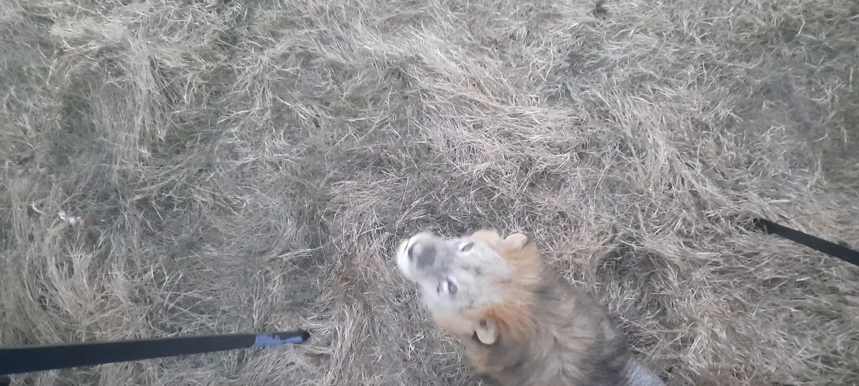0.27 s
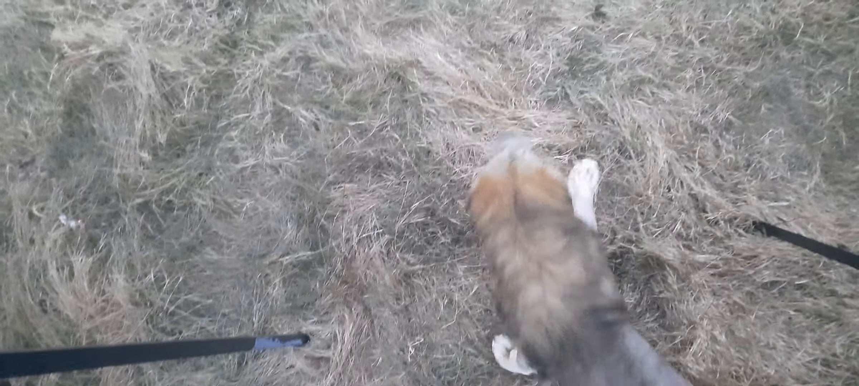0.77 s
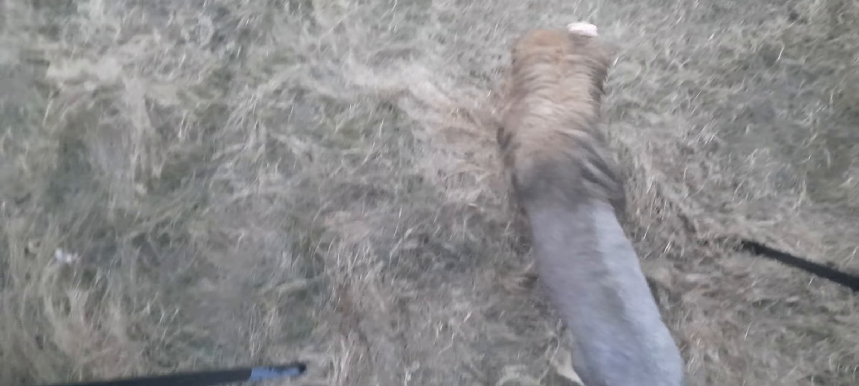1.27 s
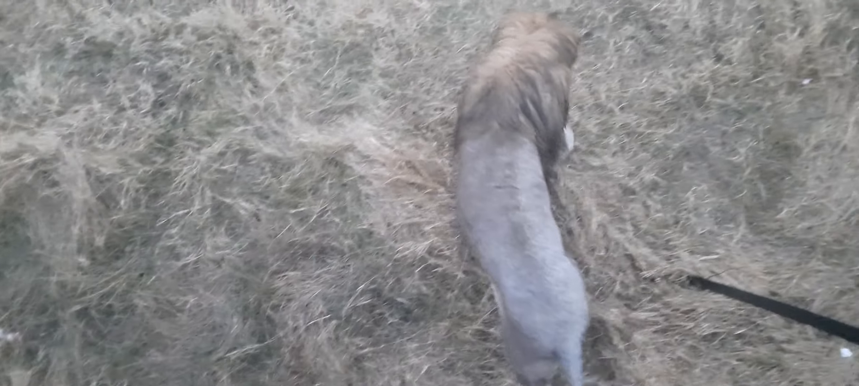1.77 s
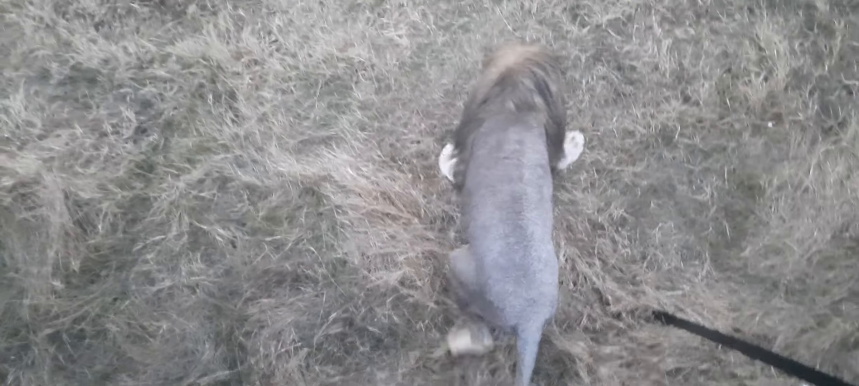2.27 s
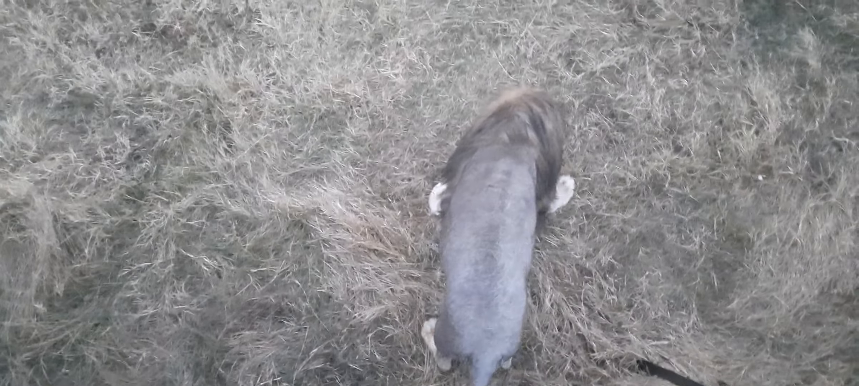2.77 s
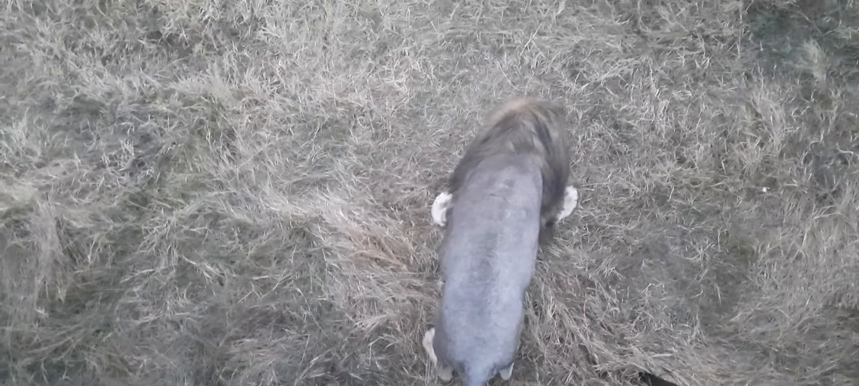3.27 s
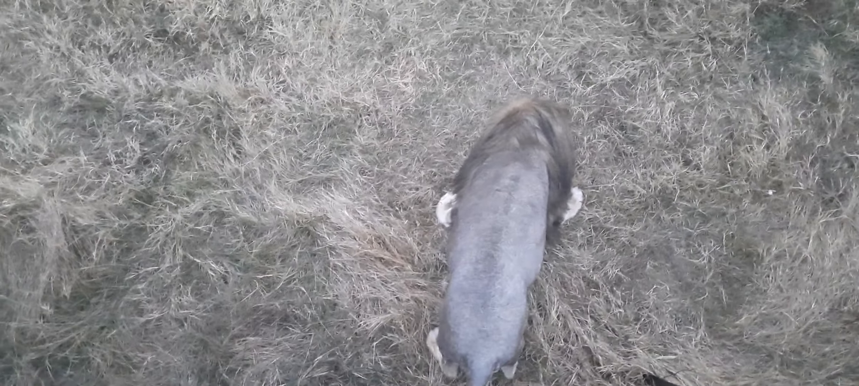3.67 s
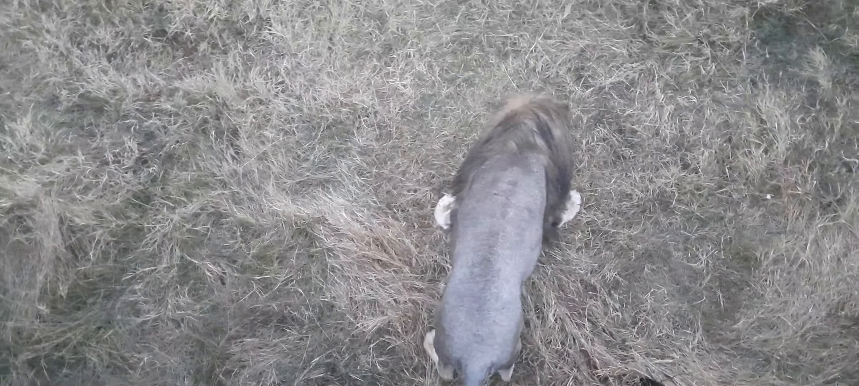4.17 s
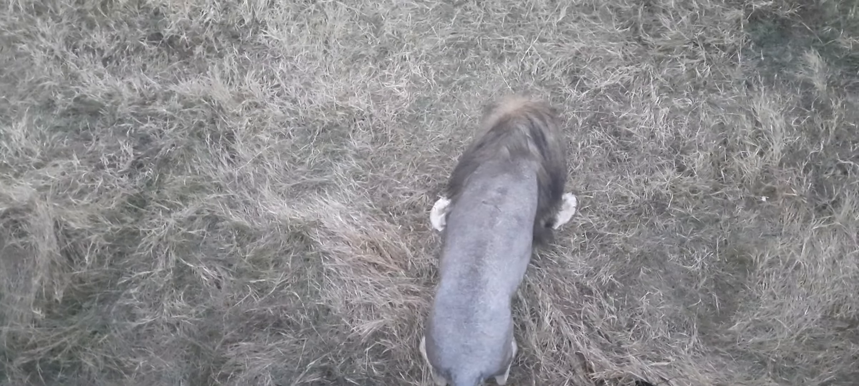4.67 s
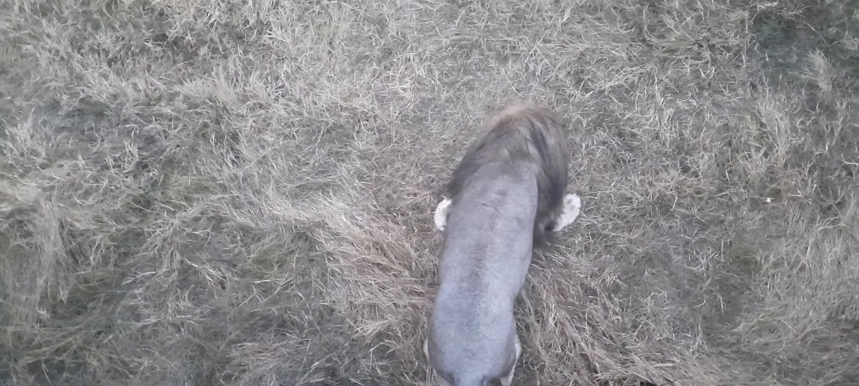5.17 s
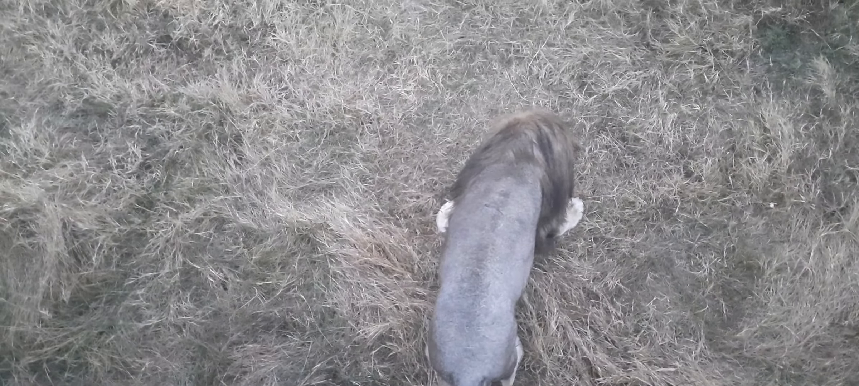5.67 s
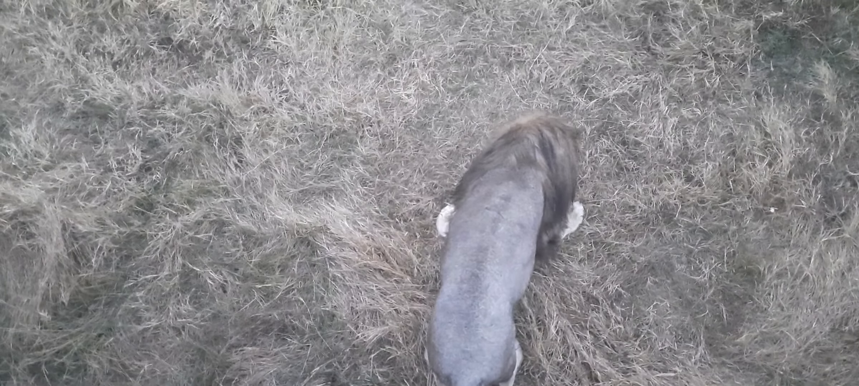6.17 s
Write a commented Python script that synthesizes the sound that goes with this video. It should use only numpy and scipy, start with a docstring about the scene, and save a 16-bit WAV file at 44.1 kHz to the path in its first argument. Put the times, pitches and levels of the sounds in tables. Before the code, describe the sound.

Brittle stems crunch and rustle under a large animal's paws, with dull body swishes, easing into scattered small snaps and light low wind rumble.

```python
"""Dry grass below a camera with two microphone ports, where a big cat turns and settles.
Stems snap and crackle under its paws: short noise puffs, each ringing at one pitch, over bands of brushing noise.
Its body drags a dull swish of two low noise bands through the thatch.
Light wind and a few knocks on the mount rumble in the bass: swelling low noise and damped sines."""
import sys
import numpy as np
from scipy import signal
from scipy.fft import rfft, irfft, next_fast_len
from scipy.io import wavfile
from scipy.ndimage import uniform_filter1d

SR = 44100
rng = np.random.default_rng(int(sys.argv[2]) if len(sys.argv) > 2 else 0)


def store_wav(level_fs):
    """Save 16-bit WAV to argv[1]."""
    pcm = np.round(np.clip(np.atleast_2d(level_fs), -1, 1) * 32767)
    wavfile.write(sys.argv[1], SR, pcm.T.astype(np.int16))


N = 282681


def undb(db):
    """Decibel law: amplitude ratio of a level."""
    return 10 ** (np.asarray(db) / 20)


def level(x, db):
    """Effective value: scale the whole signal to an rms level."""
    return x * undb(db) / np.sqrt(np.mean(x ** 2))


def columns(table):
    """Linear interpolation: each column of a curve table at every sample."""
    s, *cols = np.transpose(table)
    return [np.interp(np.arange(N) / SR, s, c) for c in cols]


def sides(pan_db):
    """Level difference between ports: left and right gain for left minus right in dB."""
    return undb(np.array([pan_db, -pan_db]) / 2)


def band(x, lo_hz, hi_hz, order=2):
    """Band limitation by a Butterworth filter."""
    return signal.sosfilt(signal.butter(order, [lo_hz, hi_hz], "band", fs=SR, output="sos"), x)


def colour(x, points):
    """Spectral shaping by (frequency [Hz], gain [dB]) points, straight over log frequency."""
    hz, db = np.transpose(points)
    size = next_fast_len(N)
    f = np.arange(size // 2 + 1) * SR / size + 1
    gain = undb(np.interp(np.log(f), np.log(hz), db))
    return irfft(rfft(x, size) * gain, size)[..., :N]


def pair(alike):
    """Partial coherence: noise at two ports with correlation `alike`."""
    a, b = rng.standard_normal((2, N))
    return np.array([a, alike * a + np.sqrt(1 - alike ** 2) * b])


def flutter(size):
    """Slow random modulation: noise smoothed by two moving averages, at unit rms."""
    smooth = uniform_filter1d(rng.standard_normal(N), size)
    return level(uniform_filter1d(smooth, size // 2), 0)


def air():
    """Stationary background noise: a fixed spectrum, partly coherent between the ports."""
    # noise spectrum: (frequency [Hz], relative density [dB])
    air_spectrum = [(18, -38), (30, 5), (70, 13.5), (217, 8), (314, 3.5), (399, -14), (608, 2), (8090, -26),
                    (9480, -39), (14500, -33.5), (16500, -53)]
    return level(colour(pair(0.73), air_spectrum), -70.5) * sides(np.array([6.5]))


def wind():
    """Turbulence at the ports: low noise whose level climbs to each gust top and falls, straight in dB."""
    # gusts: (time of the top [s], level before the noise is added [dB], length [s], left minus right [dB])
    gusts = [(0.025, -60, 0.38, 27.5), (0.375, -62, 0.072, -21), (.52, -62.5, 0.17, 19),
             (.85, -66, 0.86, 6), (2.17, -69, 0.15, 4), (3.398, -62, 0.12, 2), (5.637, -53, 0.14, 36),
             (5.8, -67, 0.47, 19), (6.41, -52, 0.16, 9)]
    breeze_db, breeze_pan_db = -77.5, 4  # the wind between gusts
    rise_share, edge_drop_db = 0.49, 15.5  # share of a gust before its top; drop at its ends
    t = np.arange(N) / SR
    gain = undb(breeze_db) * sides(np.array([breeze_pan_db]))
    for s, db, length_s, pan_db in gusts:
        # 0 at the top, 1 at either end
        away = np.maximum((s - t) / rise_share, (t - s) / (1 - rise_share)) / length_s
        gain = gain + undb(db - edge_drop_db * away) * sides(np.array([pan_db]))
    return level(band(pair(0.79), 44.6, 104.5), 0) * gain


def knocks():
    """Damped modes of the mount: a soft push on a low mode, with two overtones that die twice as fast."""
    # blows: (time [s], relative level [dB], pitch [Hz], time to fall 60 dB [s], left minus right [dB])
    blows = [(.952, -19, 149.7, 0.044, 5), (3.358, -37.5, 226, 0.018, -19)]
    out, t = np.zeros((2, N)), np.arange(SR // 10) / SR
    push = 1 - np.exp(-t / 0.0023)
    for s, db, hz, ring_s, pan_db in blows:
        fade = np.exp(-np.log(1000) * t / ring_s)
        second = 0.99 * np.sin(2 * np.pi * 2.0 * hz * t)
        third = 0.82 * np.sin(2 * np.pi * 3.02 * hz * t)
        blow = np.sin(2 * np.pi * hz * t) + fade * (second + third)
        i = int(s * SR)
        out[:, i:i + len(t)] += undb(db) * np.outer(sides(pan_db), blow * fade * push)
    return out


def swish():
    """Friction noise of the dragged thatch: a narrow hollow resonance below a wider band, fluttering."""
    # drag strength: (time [s], relative level [dB])
    drag_curve = [(0, -52.5), (.32, -67), (.52, -55.5), (.86, -52), (1.03, -57.5), (1.8, -57),
                  (2.57, -55.5), (2.66, -51), (2.92, -66.5), (4.02, -53), (4.32, -60.5), (4.71, -73.5),
                  (5.93, -67), (6.41, -54.5)]
    db, = columns(drag_curve)
    resonance = level(band(pair(0.88), 292, 352), -8.5)
    wider = level(band(pair(0.99), 369, 738), -4.0)
    flutter_db = 1.8 * flutter(size=900)
    return (resonance + wider) * undb(db + flutter_db) * sides(np.array([5.5]))


def stems(s, ring_hz, parts_db, slowness, pan_db, lag_s):
    """Brittle fracture: a noise puff per break in three bands; a positive lag_s delays the left port."""
    # thick, middle, thin parts of a stem: (low edge [Hz], high edge [Hz])
    stem_bands = [(300, 1500), (1500, 9000), (9000, 19000)]
    # thick, middle, thin parts: (time to fall 60 dB at slowness 1 [s])
    stem_ring_s = [0.016, 0.0077, 0.005]
    puff = 384  # samples of one break
    out, t = np.zeros((2, N + puff)), np.arange(puff) / SR
    shared, own = rng.standard_normal((len(s), 2, puff)).transpose(1, 0, 2)
    noise = np.array([shared, 0.54 * shared + 0.9 * own])
    # each hollow stem favours one pitch in its middle part: a damped resonance over a flat share
    x = np.arange(puff // 2 + 1) * SR / puff / ring_hz[:, None]
    hollow = 0.67 + .5j * x / (1 - x ** 2 + .5j * x)
    # the crack runs through the fibre for a moment, then dies
    rise = (t / 0.00015) ** 1.08
    puffs = 0
    for (lo, hi), ring_s, db, tone in zip(stem_bands, stem_ring_s, parts_db, (1, hollow, 1)):
        decay = np.exp(-np.log(1000) * t / (ring_s * slowness[:, None]))
        shape = rise / (1 + rise) * decay
        part = band(irfft(rfft(noise * shape) * tone, puff), lo, hi)
        rms = np.sqrt(np.mean(part ** 2, axis=-1, keepdims=True))
        puffs = puffs + part * undb(db - 2.5)[:, None] / rms
    end_fade = np.minimum(1, (t[-1] - t) / 0.0018)
    puffs = puffs * end_fade * sides(pan_db)[:, :, None]
    for port, sign in enumerate((1, -1)):
        start = np.clip((s + sign * lag_s / 2) * SR, 0, N - 1).astype(int)
        at = start[:, None] + np.arange(puff)
        out[port] = np.bincount(at.ravel(), puffs[port].ravel(), N + puff)
    return out[:, :N]


def rustle():
    """Superposed random impulses: many small breaks, mostly tiny, over the friction noise of brushing blades."""
    # moving grass: (time [s], drive level [dB], coarse blades' extra [dB], fine blades' extra [dB])
    rustle_curve = [(0, -45.5, -1, -1.5), (.18, -54, -1.5, -1.5), (.76, -40, -1.5, 0), (.83, -44, -2, 1),
                    (.92, -41, 0, -0.5), (1.18, -49.5, -0.5, -0.5), (1.79, -54.5, 0, -1),
                    (2.16, -49, 1.5, 0), (2.27, -51, 0, 1.5), (2.5, -48.5, -1, 1), (2.71, -47.5, 4, 1),
                    (2.78, -49.5, -1.5, 0.5), (3.04, -59.5, -0.5, 1), (3.51, -60.5, 1.5, 0),
                    (4.25, -60.5, -1.5, -1), (4.45, -60, 1, -0.5), (4.78, -63.5, -1, 0),
                    (5.93, -63.5, 1, -1.5), (6.2, -58.5, -1, -1), (6.41, -62.5, -2, 0)]
    # coarse, middle, fine blades: (low edge [Hz], high edge [Hz])
    blade_bands = [(1000, 4000), (4000, 9000), (9000, 18000)]
    # coarse, middle, fine blades; harder rustling brings out the finer ones:
    # (base level at the usual drive [dB], slope [dB per dB of drive])
    blades = [(-54.5, 0.71), (-54.5, 1.1), (-55.5, 1.03)]
    usual_db, crackles_per_s = -54.5, 900
    grass_pan_db, grass_lag_s = 7, .00045  # the grass moves nearer the left port

    db, coarser_db, finer_db = columns(rustle_curve)
    blades_db = np.array([usual + slope * (db - usual_db) for usual, slope in blades])
    blades_db += 1.27 * flutter(size=1500)
    blades_db += [coarser_db, 0 * db, finer_db]

    count = int(crackles_per_s * N / SR)
    u = rng.random((count, 4)).T
    g = np.clip(rng.standard_normal((count, 5)).T, -2, 2)
    at = (u[0] * N).astype(int)
    coarse_db, middle_db, fine_db = blades_db[:, at]
    ring_db = (1 - u[3]) * coarse_db + u[3] * middle_db  # coarse blades ring low
    size_db = -4 * np.log(u[1] + 0.017) - 11  # a few larger breaks
    parts_db = size_db + 2.97 * g[:3] + np.array([coarse_db - 7.0, ring_db, fine_db - 3])
    ring_hz, slowness = 1700 * 5.24 ** u[3], .5 + 3.5 * u[2]
    pan_db, lag_s = grass_pan_db + 4 * g[3], -grass_lag_s + .0002 * g[4]
    crackle = stems(at / SR, ring_hz, parts_db, slowness, pan_db, lag_s)

    left, right = pair(0.074)
    hiss = np.array([left, np.roll(right, int(grass_lag_s * SR))])
    brush = sum(level(band(hiss, lo, hi), -6.0) * undb(db) for (lo, hi), db in zip(blade_bands, blades_db))
    return crackle + brush * sides(np.array([grass_pan_db]))


def snaps():
    """Fracture with aftershocks: loud breaks trailing splinters; the port a break leans away from hears it late."""
    # loudest snapping stems: (time [s], pitch [Hz], thick part's relative level [dB],
    # middle part's [dB], thin part's [dB], left minus right [dB])
    breaks = [(.0936, 7400, -43.5, -38.5, -41, 6.5), (.126, 7440, -65, -42, -48, 12.5),
              (0.2005, 1610, -48, -50.5, -48, 15), (.402, 1890, -48, -38.5, -55, 7.5),
              (0.4982, 1550, -55, -38.5, -44, 10), (.585, 5330, -47, -41, -47, 7.5),
              (0.6526, 5500, -70, -42, -33.5, 12), (.6285, 5500, -52, -41, -39.5, 8.5),
              (.6898, 6350, -55, -43, -42, 8), (.767, 5940, -50, -37.5, -50, 9.5),
              (0.7829, 2560, -38.5, -29.5, -47, 6), (.889, 7400, -45, -35, -34, 12),
              (.9545, 1600, -49, -45, -37.5, 12.5), (.9935, 1500, -42, -44, -55, 7),
              (1.0312, 2870, -52, -37, -49, 12), (1.2423, 2000, -49, -40, -38, -1),
              (1.2621, 1810, -51, -40, -39, 16), (1.3842, 2500, -41, -30.5, -32.5, -2),
              (1.395, 6800, -63, -38.5, -47, 9), (1.4436, 2650, -46, -40, -51, 13),
              (1.5003, 2500, -46, -39.5, -53, 4.5), (1.5051, 2880, -50, -38.5, -40, 12.5),
              (1.6125, 4000, -45.5, -40, -44, 7.5), (1.722, 6040, -73, -40, -43, 7),
              (1.899, 4330, -56, -37, -49, 14), (1.9075, 7300, -34.5, -31.5, -37, 3),
              (2, 7600, -53, -37.5, -45, 1), (2.14, 7000, -50.5, -45.5, -42.5, 19),
              (2.183, 7600, -42, -35, -40, 10), (2.4578, 7360, -56, -39.5, -52, 13),
              (2.4953, 2200, -41.5, -33, -36, 2.5), (2.5041, 3000, -42, -29.5, -44, 8.5),
              (2.5576, 6330, -44, -43, -60, -0.5), (2.6693, 4960, -45, -42, -53, 0),
              (2.6997, 4900, -48.5, -42.5, -51, 11), (2.7404, 2980, -57, -37.5, -45.5, 12.5),
              (2.8363, 6200, -59, -40.5, -49, 5), (2.975, 3720, -57, -45, -74, 11),
              (3.1513, 6250, -54.5, -48, -53, 10), (3.177, 6500, -56, -45, -53, -1),
              (3.1956, 2970, -50.5, -39.5, -41, 5), (3.2562, 3270, -46, -41, -44.5, 2),
              (3.3495, 1500, -47, -56, -64, -9.5), (3.4382, 5300, -49.5, -42.5, -46, 13.5),
              (3.458, 6200, -55, -46, -47, 11.5), (3.4802, 4900, -48.5, -31, -32.5, 7),
              (3.4937, 2360, -48, -42, -48, 5.5), (3.5506, 2200, -51, -41, -44.5, 8.5),
              (3.591, 2950, -46, -38.5, -51, 0.5), (3.663, 6900, -43, -29, -30.5, 1),
              (3.6855, 5500, -47, -34.5, -40, 0.5), (3.8733, 2570, -44.5, -36.5, -45.5, 5),
              (3.9571, 1490, -45.5, -36.5, -41.5, 4), (4.1396, 3740, -53, -44.5, -58, 8),
              (4.2846, 1930, -56, -43.5, -65, 1.5), (4.3085, 1550, -38, -36, -40, 7.5),
              (4.3617, 3000, -56.5, -47.5, -56, 8.5), (4.4028, 4000, -50.5, -47, -49, 15),
              (4.4305, 1590, -49.5, -36, -42, 10.5), (4.464, 7550, -51, -35.5, -30.5, 13),
              (4.4738, 5700, -45.5, -35.5, -40, -1.5), (4.4847, 6270, -56, -47.5, -50, 15.5),
              (4.6864, 6400, -61, -53, -63, -1.5), (4.8468, 4850, -76, -52.5, -56, 15),
              (4.9442, 5540, -55, -46.5, -50, 10.5), (4.9587, 1590, -50.5, -47.5, -60, 3.5),
              (5.1196, 2670, -42, -36, -41.5, 6.5), (5.1637, 3100, -53.5, -47, -56, 12.5),
              (5.3769, 2800, -55.5, -48, -52.5, 12), (5.4285, 3400, -60, -48.5, -60, 8),
              (5.6126, 3100, -51.5, -42, -51, 2.5), (5.6961, 3760, -65, -44.5, -50.5, 11.5),
              (5.9553, 7660, -55, -50, -51, 10), (6.0346, 6150, -42.5, -33.5, -38, 3.5),
              (6.1117, 2400, -54, -44.5, -51, 3), (6.1903, 6200, -53, -39.5, -45.5, 0.5),
              (6.2336, 3900, -42, -36, -43, 12), (6.2647, 6000, -70, -45.5, -50, 17),
              (6.275, 5560, -66, -42, -46, 6), (6.375, 5540, -56, -50, -64, 10)]
    splinters = 3  # small breaks after each snap
    spread_s, late_s, splinter_db, scatter_db = .025, .003, -18.5, 3

    s, hz, *parts_db, pan_db = np.transpose(breaks)
    loud = stems(s - .0007, hz, parts_db, np.ones(len(s)), pan_db, -4e-5 * (pan_db - 5))

    g = rng.standard_normal((len(s) * splinters, 6)).T
    s, hz, *parts_db, pan_db = np.repeat(breaks, splinters, axis=0).T
    parts_db = np.array(parts_db) + splinter_db + scatter_db * g[:3]
    ring_hz = np.clip(hz * 1.72 ** g[4], 1200, 9000)
    later_s = s + late_s + spread_s * np.abs(g[3])
    lag_s = -4e-5 * (pan_db - 4.5)
    small = stems(later_s, ring_hz, parts_db, np.ones(len(s)), pan_db + 3 * g[5], lag_s)
    return loud + small


def scene():
    """Linear superposition: the grass coloured by the ports, plus the other layers."""
    # response of the ports: (frequency [Hz], gain [dB])
    port_response = [(200, 0), (700, 2), (1500, 5.5), (2700, 2.5), (4500, 1), (6500, 2), (8200, 4.5),
                     (9200, 1), (10500, 7.5), (12300, 7.5), (15000, -5.5)]
    grass = colour(snaps() + rustle(), port_response)
    return air() + wind() + knocks() + swish() + grass


def record(dry):
    """Band limitation in the camera: the deepest bass is thinned and the top is cut."""
    thinned = signal.sosfilt(signal.butter(2, 45, "high", fs=SR, output="sos"), dry)
    top_hz = 16000
    return signal.sosfilt(signal.ellip(8, .2, 70, top_hz, fs=SR, output="sos"), thinned)


dry = scene()
out = record(dry)
store_wav(out)
```